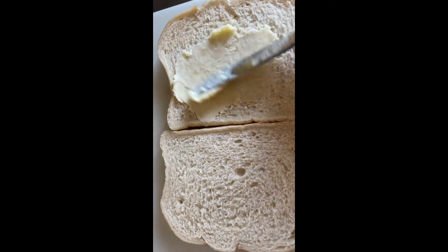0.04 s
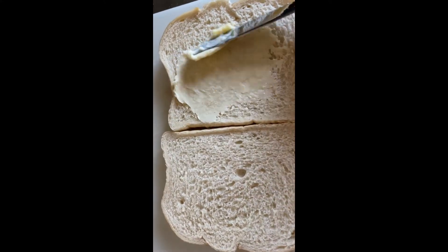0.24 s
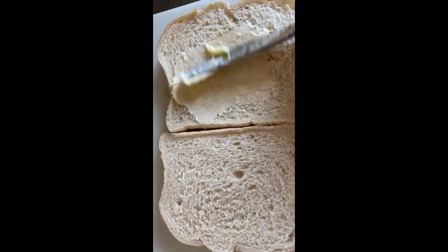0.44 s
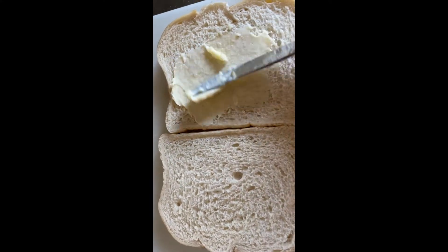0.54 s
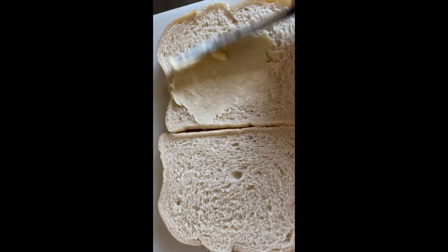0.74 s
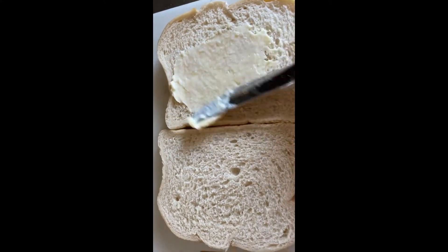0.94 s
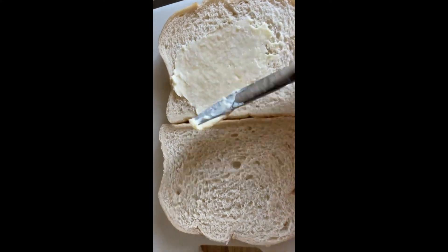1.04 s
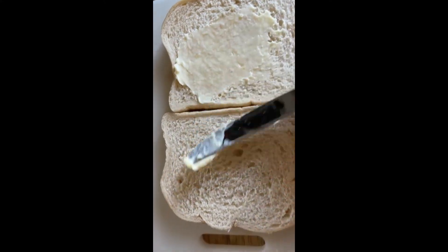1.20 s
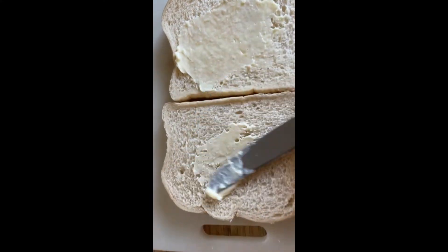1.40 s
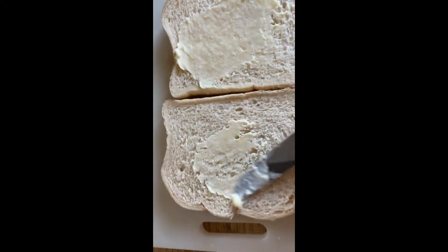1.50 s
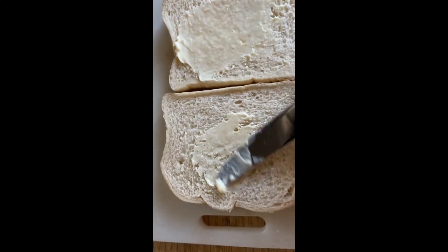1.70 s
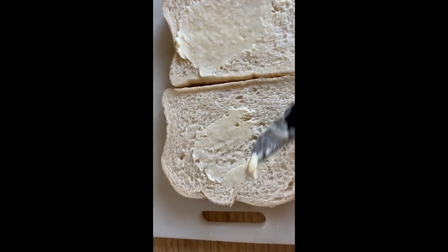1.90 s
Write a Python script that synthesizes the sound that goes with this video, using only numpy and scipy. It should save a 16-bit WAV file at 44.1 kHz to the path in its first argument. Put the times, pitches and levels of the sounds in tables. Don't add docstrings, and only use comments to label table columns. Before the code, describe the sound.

A knife butters bread, close to a phone in a quiet kitchen. A sharp tap cracks and rings the plastic board at 0.25 s, then a slow hissing scrape at 0.3. A second tap at 0.77 leads into quick scraping with crust snaps, loudest near 0.92. Low soft thuds come at 0.95 and 1.27; drier strokes run 1.25-1.5 and from 1.7. Low hum, a faint thin whine and early distant bird chirps lie beneath.

```python
import sys
import numpy as np
from scipy import signal
from scipy.fft import rfft, irfft, next_fast_len
from scipy.io import wavfile
from scipy.ndimage import uniform_filter1d

SR = 44100
rng = np.random.default_rng(int(sys.argv[2]) if len(sys.argv) > 2 else 0)


def voltage_ratio(decibels):
    exponent = np.asarray(decibels, float) / 20
    return 10 ** exponent


def master_out(mix):
    frames = np.transpose(np.atleast_2d(mix))
    ceiling = np.clip(frames, -1, 1)
    pcm = np.round(ceiling * 32767).astype(np.int16)
    wavfile.write(sys.argv[1], SR, pcm)


N = 85995

# start [s], speeding-up time [s], length [s], hiss level [dB], drag level [dB].
STROKES = [
    (.0002, .0004, .024, -62, -67),
    (.31, .11, .155, -65, -64),
    (.722, .012, .075, -70, -68),
    (.8, .055, .13, -68.5, -65),
    (1.12, .11, .16, -74, -78),
    (1.25, .14, .225, -71, -67),
    (1.72, .12, .2, -74, -66),
]
# frequency [Hz], likeness [0 to 1].
AIR_SAME = [(150, 0.96), (600, .3), (2000, 0.83), (3800, 0.15), (6500, .85), (12500, 1)]


def evened(x):
    return x / np.sqrt(np.mean(x ** 2) + 1e-20)


def read(points, hz):
    f, value = np.transpose(points)
    return np.interp(np.log(hz + 1), np.log(f + 1), value)


def add(mix, s, sound):
    part = mix[round(s * SR):][:len(sound)]
    part += sound[:len(part)]


def shaped(x, response):
    size = next_fast_len(x.shape[-1] + 4096)
    spectrum = rfft(x, size) * response(np.fft.rfftfreq(size, 1 / SR))
    return irfft(spectrum, size)[..., :x.shape[-1]]


def tail(t60_of, size):
    hz, t, z = signal.stft(rng.standard_normal(size), SR, nperseg=256)
    decay = voltage_ratio(-60 * t / t60_of(hz)[:, None])
    out = signal.istft(z * decay, SR, nperseg=256)[1]
    return out / np.linalg.norm(out)


def scrape():
    # frequency [Hz], level [dB].
    buttered = [(150, -14), (400, -6), (650, -2), (1000, 0), (1500, -4), (2200, -9), (3500, -14),
                (6000, -30)]
    # frequency [Hz], level [dB].
    dry_bread = [(200, -22), (700, -16), (1000, 0), (1500, -1), (2300, -3), (2800, -13), (4000, -15),
                 (6000, -30)]
    second_slice_s = 1.1
    t = np.arange(N) / SR
    rub = grains()
    *_, hiss_db, drag_db = np.transpose(STROKES)
    hiss = evened(crumb_hiss(rub)) * effort(t, 0, 1, hiss_db)
    first = evened(shaped(rub, lambda hz: voltage_ratio(read(buttered, hz))))
    second = evened(shaped(rub, lambda hz: voltage_ratio(read(dry_bread, hz))))
    drag_effort = effort(t, lag=.005, slower=1.1, levels_db=drag_db)
    drag = np.where(t < second_slice_s, first, second) * drag_effort
    return hiss + drag + crust_snaps()


def grains():
    grains_per_s, spread_db, clump_db, clump_s = 6000, 2.8, 2.4, .005
    size = voltage_ratio(spread_db * np.minimum(rng.exponential(1, N), 5)) * rng.standard_normal(N)
    clump = evened(uniform_filter1d(rng.standard_normal(N), max(round(clump_s * SR), 1)))
    tears = size * (rng.random(N) < grains_per_s / SR)
    return (tears + 0.62 * rng.standard_normal(N)) * voltage_ratio(clump_db * clump)


def crumb_hiss(x):
    # frequency [Hz], level [dB].
    hiss_colour = [(300, -24), (1200, -10), (3000, -9), (5500, -3), (9000, -4), (11200, 2), (13000, -22),
                   (15500, -46)]
    return shaped(x, lambda hz: voltage_ratio(read(hiss_colour, hz)))


def effort(t, lag, slower, levels_db):
    lift_s, rest_db = .05, -24
    out = np.zeros(N)
    for (start, rise, length, *_), db in zip(STROKES, levels_db):
        end = start + length + lag
        moving = start + min(rise * slower, length)
        shape = np.interp(t, [start - .01, start, moving, end, end + lift_s], [3, 1, 0, 0, 1], right=3)
        out += voltage_ratio(db + rest_db * shape)
    return out


def crust_snaps():
    # time [s], level [dB].
    crumbs = [(0.0275, -52), (0.0544, -63.5), (0.3167, -55), (0.3616, -53.5), (0.3879, -47), (0.4144, -57),
              (0.4193, -41.5), (0.7327, -57.5), (0.8467, -43), (0.8614, -41.5), (0.8738, -42),
              (0.8805, -46.5), (0.9014, -46.5), (0.923, -33.5), (1.3328, -43.5), (1.3685, -51),
              (1.4631, -52), (1.4757, -49), (1.496, -50.5), (1.8213, -52), (1.8622, -47.5), (1.8978, -50),
              (1.9097, -47)]
    snap_s, snap_db, low_cut_hz = .0004, 1.5, 2500
    snaps = np.zeros(N)
    u = np.arange(400) / SR
    envelope = u / snap_s * np.exp(1 - u / snap_s)
    for (at, db), burst in zip(crumbs, rng.standard_normal((len(crumbs), 400))):
        add(snaps, at, voltage_ratio(db + snap_db) * burst * envelope)
    return shaped(crumb_hiss(snaps), lambda hz: 1 / (1 + (low_cut_hz / (hz + 1)) ** 2))


def blow(db, top_hz, rebound_db, boom_db):
    t = np.arange(SR // 3) / SR
    hit = board_ring(t) + contact_crack(t) + worktop_scatter(t)
    hit = shaped(hit, lambda f: rebound(f, rebound_db) * bending_delay(f) * softness(f, top_hz))
    return voltage_ratio(db) * hit / abs(hit).max() * 1.87 + voltage_ratio(boom_db) * 7.5 * worktop_boom(t)


def board_ring(t):
    # frequency [Hz], level [dB], t60 [s].
    modes = [(145, -10, 0.14), (267.7, -3, .08), (370, -5, .1), (486, -8.5, 0.076), (575, 1, .07),
             (838, -0.5, 0.079), (940, -5.5, .045), (1130, 1, 0.023), (1311.6, -2.5, .035),
             (1494, -8, 0.018), (2146, -15.5, 0.018), (2684, -7, 0.03), (3100, -5.5, .02),
             (4286, -6.5, .015)]
    rise_turns = 1.1
    hz, mode_db, t60 = np.transpose(modes)[:, :, None]
    ring = voltage_ratio(mode_db - 60 * t / t60) * (1 - np.exp(-t * hz / rise_turns))
    return 0.33 * (ring * np.sin(2 * np.pi * hz * t)).sum(0)


def contact_crack(t):
    # frequency [Hz], level [dB].
    crack_colour = [(300, -28), (1000, 5.5), (1900, -12), (2900, -4), (3600, -17.5), (4300, -4.5),
                    (6800, -21), (9000, -44.5)]
    crack_db = -1
    click = 20. * (np.arange(len(t)) == 40)
    return shaped(click, lambda f: voltage_ratio(crack_db + read(crack_colour, f)))


def worktop_scatter(t):
    # frequency [Hz], level [dB], t60 [s].
    rattle = np.array([(60, -18, .3), (130, 2, .25), (250, -2, 0.22), (450, 0, .13), (700, -12, .1),
                       (1100, -8, .09), (2500, -17, .1), (5000, -27, .1)])
    rattle_db, build_s = -6, 0.0053
    scatter = tail(lambda f: read(rattle[:, ::2], f), size=16000)[:len(t)]
    scatter = scatter * (1 - np.exp(-t / build_s))
    return 40 * shaped(scatter, lambda f: voltage_ratio(rattle_db + read(rattle[:, :2], f)))


def rebound(f, rebound_db):
    return 1 + voltage_ratio(rebound_db) * np.exp(-2j * np.pi * f * .0041) / (1 + (f / 1500) ** 2)


def bending_delay(f):
    spread, from_hz = .08, 250
    return np.exp(-4j * np.pi * spread * (np.sqrt(f + from_hz) - np.sqrt(from_hz)))


def softness(f, top_hz):
    return 1 / (1 + 1.4j * f / top_hz - (f / top_hz) ** 2) ** 3


def worktop_boom(t):
    hz, t60, rise_s, rough = 52.4, 0.26, 0.027, .15
    wobble = 1 + rough * evened(uniform_filter1d(rng.standard_normal(len(t)), 1300))
    swell = (1 - np.exp(-t / rise_s)) ** 3
    return swell * voltage_ratio(-60 * t / t60) * wobble * np.sin(2 * np.pi * hz * t)


def board_blows():
    # time [s], level [dB], hardness as top frequency [Hz], rebound [dB], worktop boom [dB].
    blows = [(.003, -65, 500, -9, -68), (0.2471, -22.5, 7030, -8, -46.5), (.395, -62, 250, -9, -51),
             (.46, -68, 303, -9, -69.5), (0.7732, -26.5, 5500, -1, -44), (.9, -60, 250, -9, -58),
             (.954, -48, 460, -5, -48), (1.05, -62.5, 250, -9, -60.5), (1.269, -44, 480, -5, -44.5),
             (1.361, -58, 200, -9, -57), (1.505, -73, 300.1, -9, -72), (1.725, -70, 297, -9, -58.5),
             (1.8, -73.5, 310, -9, -61.5)]
    board = np.zeros(N)
    for s, *row in blows:
        add(board, max(s - .002, 0), blow(*row))
    return board


def placed(x, room_db):
    # frequency [Hz], t60 [s].
    room = [(100, 0.35), (300, 0.49), (1000, 0.31), (3000, .35), (8000, 0.27)]
    # frequency [Hz], likeness [0 to 1].
    near_same = [(200, .993), (600, .88), (1800, .95), (3500, .8), (6000, .96), (12500, .86)]
    echo = []
    for port in range(2):
        reflections = np.r_[np.zeros(130), tail(lambda hz: read(room, hz), size=20000)]
        echo.append(signal.fftconvolve(x, reflections)[:N])
    smear = signal.fftconvolve(x, tail(lambda hz: 0.028 + 0 * hz, size=1300))[:N]
    return ports(x, smear, near_same) + voltage_ratio(room_db) * ports(*echo, AIR_SAME)


def ports(left, other, same):
    # frequency [Hz], turn [radians].
    lead = [(0, 0), (2300, .2), (4200, .9), (4800, 3.1), (5500, 5.6), (9250, 9.42), (12200, 12.5),
            (20000, 12.6)]

    def like(hz):
        return np.clip(read(same, hz), 0, 1)

    turned = shaped(left, lambda hz: like(hz) * np.exp(-1j * np.interp(hz, *np.transpose(lead))))
    unrelated = shaped(other, lambda hz: np.sqrt(1 - like(hz) ** 2))
    return np.array([left, turned + unrelated])


def air():
    # frequency [Hz], level [dB].
    hush_colour = [(25, 1.5), (52, 20), (130, 13.5), (350, -1.5), (1500, -15), (4800, -16), (11300, -20),
                   (14000, -41.5)]
    hush_db, fade_db_per_s = -68, -1.1
    t = np.arange(N) / SR
    hush = evened(shaped(rng.standard_normal((2, N)), lambda hz: voltage_ratio(read(hush_colour, hz))))
    level = voltage_ratio(hush_db + fade_db_per_s * t)
    return ports(*(level * hush + electric_whine(t) + far_bird()), AIR_SAME)


def electric_whine(t):
    hz, level_db, flicker_db = 11600, -94, 2.2
    flicker = evened(uniform_filter1d(rng.standard_normal(N), 900))
    return voltage_ratio(level_db + flicker_db * flicker) * np.sin(2 * np.pi * hz * t)


def far_bird():
    # start [s], length [s], first pitch [Hz], last pitch [Hz], level [dB].
    chirps = [
        (0.037, 0.24, 5350, 4700, -88),
        (.5, .22, 6040, 5000, -94),
    ]
    song = np.zeros(N)
    for s, length, from_hz, to_hz, db in chirps:
        u = np.arange(0, 1, 1 / (length * SR))
        quiver = 900 * uniform_filter1d(rng.standard_normal(N), 300)[:len(u)]
        hz = from_hz + (to_hz - from_hz) * u + quiver
        add(song, s, voltage_ratio(db) * np.sqrt(np.sin(np.pi * u)) * np.sin(2 * np.pi * np.cumsum(hz) / SR))
    return song


def scene():
    return placed(scrape(), room_db=-13.5) + placed(board_blows(), room_db=-14.5) + air()


def low_pass(x):
    return signal.sosfilt(signal.butter(12, 15800, fs=SR, output="sos"), x)


def record(dry):
    return low_pass(dry)


dry = scene()
out = record(dry)
master_out(out)
```